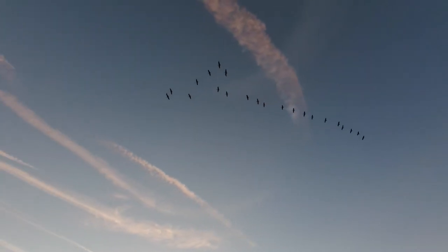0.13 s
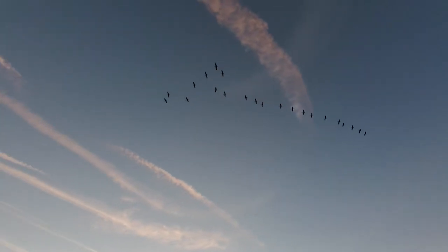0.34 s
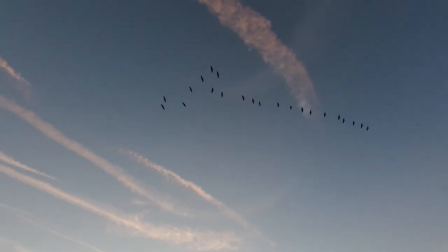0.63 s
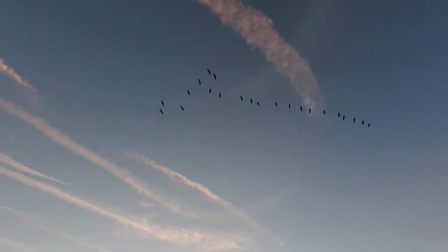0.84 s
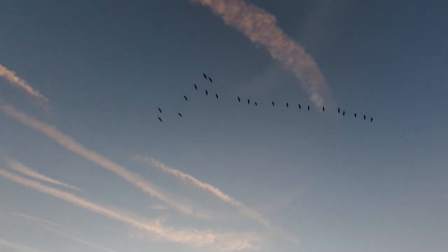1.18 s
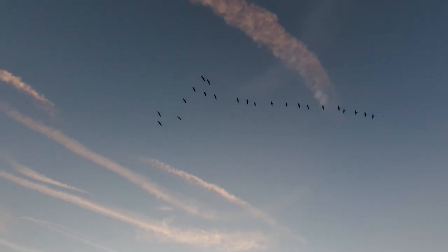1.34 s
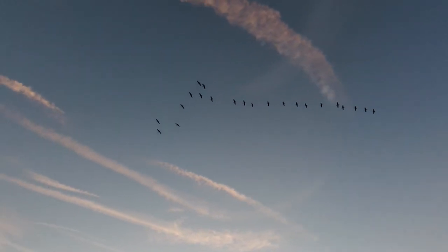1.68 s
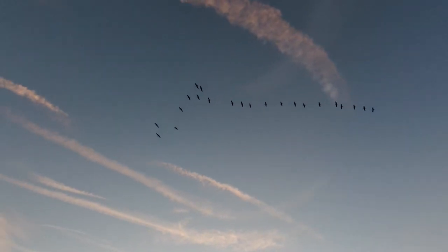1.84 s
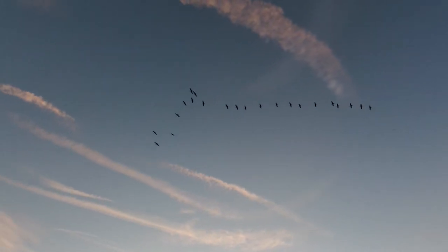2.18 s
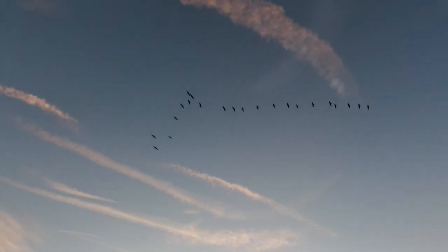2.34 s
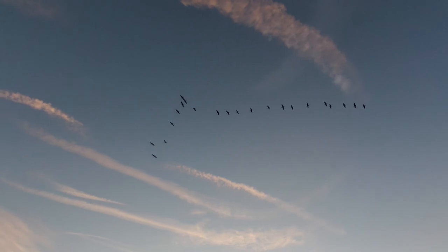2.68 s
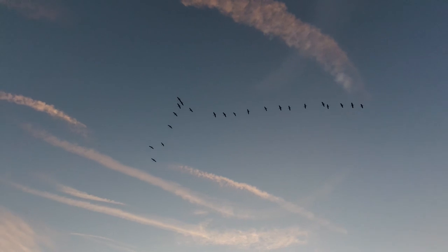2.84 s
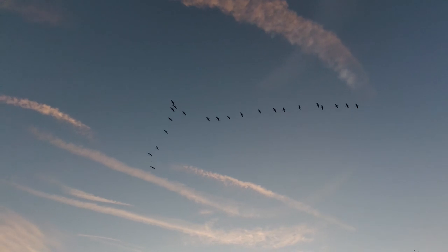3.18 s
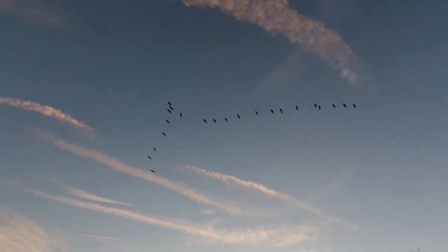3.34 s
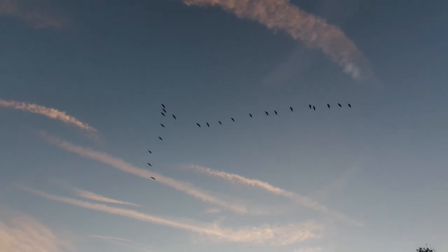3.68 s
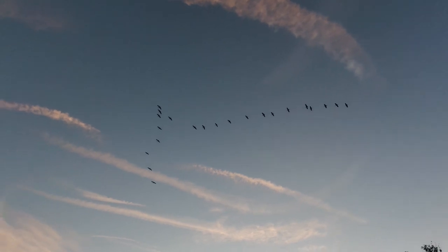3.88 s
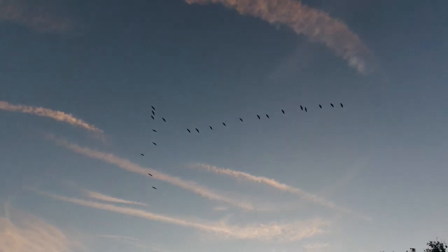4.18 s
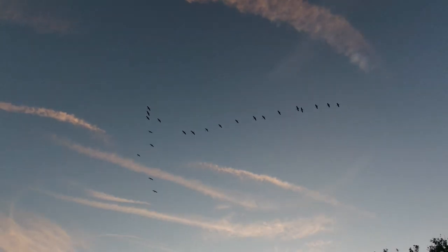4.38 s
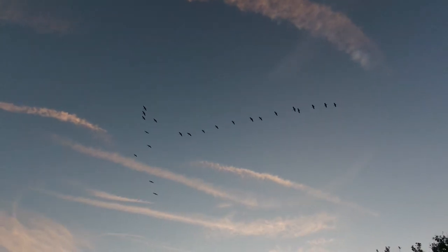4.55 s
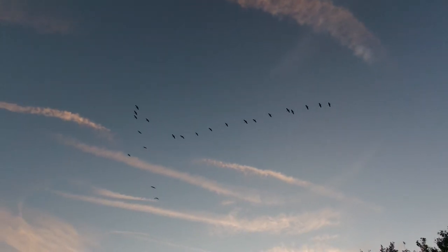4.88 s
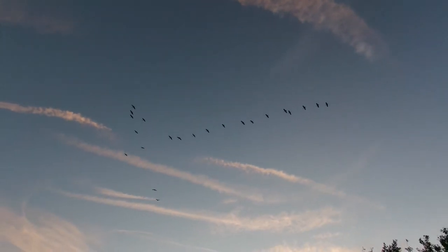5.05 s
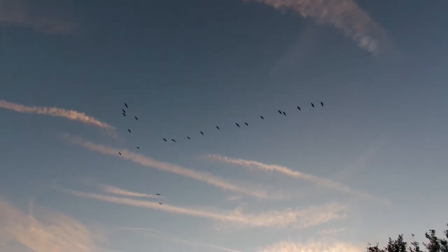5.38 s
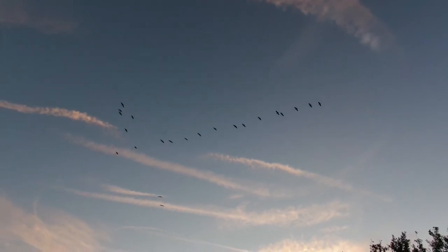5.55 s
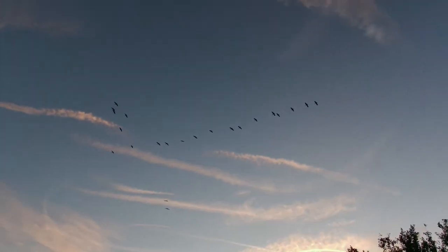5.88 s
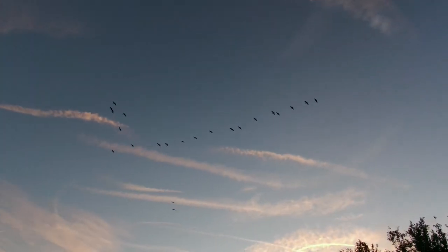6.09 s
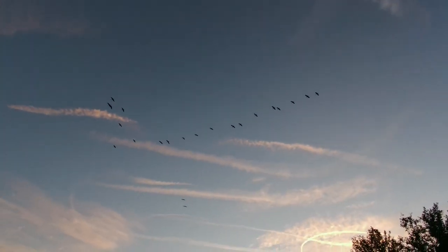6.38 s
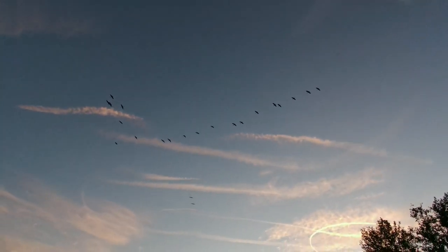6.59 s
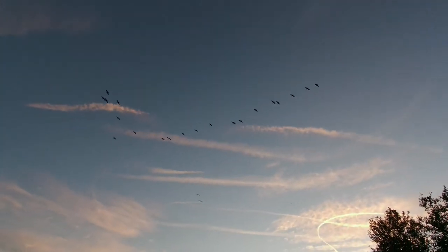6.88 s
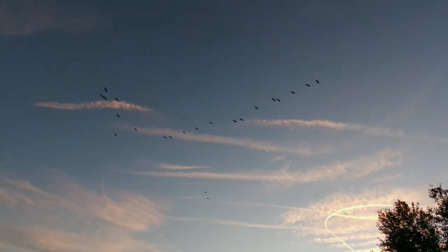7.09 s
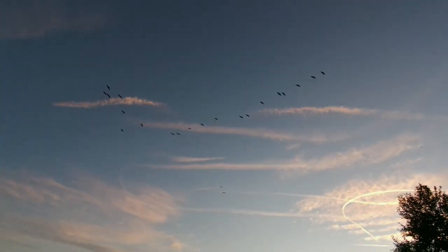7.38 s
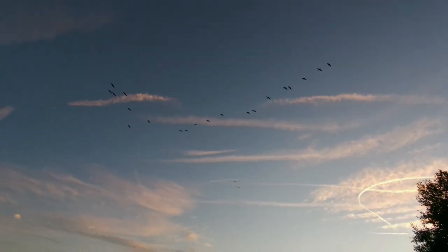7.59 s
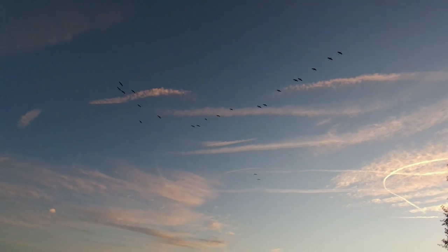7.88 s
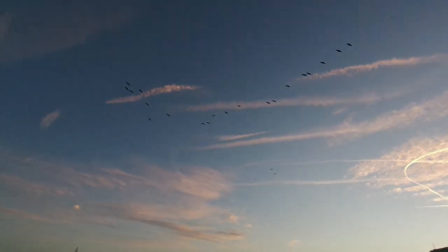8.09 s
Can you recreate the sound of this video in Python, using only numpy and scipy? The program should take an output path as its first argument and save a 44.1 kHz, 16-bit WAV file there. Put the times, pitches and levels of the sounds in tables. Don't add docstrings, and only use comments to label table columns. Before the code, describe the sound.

A wedge of cranes passes overhead in open country, calling without pause. Clear nasal bugle notes and rolled, throaty rattles stand out from a hoarse overlapping chorus that swells in bursts. Young birds occasionally whistle and peep thinly. Trees and fields return a faint dull echo. Beneath lie distant traffic hum and hiss; the hand-held camera adds brief creaks and thin, high motor whines.

```python
import sys
import numpy as np
from scipy import signal
from scipy.fft import rfft, irfft
from scipy.io import wavfile
from scipy.ndimage import uniform_filter1d, map_coordinates

SR = 44100
rng = np.random.default_rng(int(sys.argv[2]) if len(sys.argv) > 2 else 0)


def gain_from_db(level_db):
    decades = np.asarray(level_db, float) / 20
    return 10 ** decades


def put_to_file(sound):
    columns = np.atleast_2d(sound).T
    safe = np.clip(columns, -1, 1)
    whole_steps = np.round(safe * 32767)
    wavfile.write(sys.argv[1], SR, whole_steps.astype(np.int16))


N = 362943
HOARSE_TILT_DB = -0.72


def at_hz(points, hz):
    point_hz, point_db = np.array(points).T
    return np.interp(np.log(hz), np.log(point_hz), point_db)


def drift(n, rate):
    knots = rng.standard_normal(600 if n < SR else int(n * rate / SR) + 6)
    steps = np.arange(0, n + 8, 8)
    curve = map_coordinates(knots, [2 + steps * rate / SR], order=2, mode="mirror")
    return np.interp(np.arange(n), steps, curve)


def add(out, sound, s):
    i = round(s * SR)
    sound, i = sound[..., max(-i, 0):], max(i, 0)
    out[..., i:i + sound.shape[-1]] += sound[..., :N - i]


def fade(n, edge_s):
    to_nearest_end = np.minimum(np.arange(n), np.arange(n)[::-1])
    return np.sin(np.pi / 2 * np.minimum(to_nearest_end / (edge_s * SR), 1)) ** 2


def sine(hz):
    return np.sqrt(2) * np.sin(2 * np.pi * np.cumsum(hz) / SR)


def voice(hz, wobble, tilt_db):
    # (frequency [Hz], level [dB])
    throat_spectrum = [(1250, -1), (1750, 2), (2200, -2.5), (2680, -20.5), (3300, -3.5), (4200, -12),
                       (5100, -14), (6500, -29)]
    flutter_db = 2.5
    jitter = drift(len(hz), 60.0) + 1.6 * drift(len(hz), 350.0)
    phase = 2 * np.pi * np.cumsum(hz * (1 + wobble * jitter)) / SR + rng.uniform(0, 2 * np.pi)
    k = np.arange(2, 8)[:, None]
    throat = gain_from_db(at_hz(throat_spectrum, k * hz[::400]) + tilt_db * k)
    flicker = gain_from_db(flutter_db * rng.standard_normal(size=(6, 64))[:, :throat.shape[1]])
    gains = throat * flicker / np.sqrt(np.sum(throat ** 2, axis=0).mean())
    gains = uniform_filter1d(np.repeat(gains, repeats=400, axis=1), size=400, axis=1)[:, :len(hz)]
    return np.sqrt(2) * np.array([np.sin(phase), np.sum(gains * np.sin(k * phase), axis=0)])


def calls(table, climb_per_s, droop_share, crest, edge, wobble, rasp, uneven_db, tilt_db):
    out = np.zeros(N)
    for s, span, top_hz, low_db, over_db in table:
        t = np.arange(int(span * SR)) / SR
        rise = np.clip(1 - t / (crest * span), 0, 1)
        droop = np.clip(t / span - crest, 0, 1) / (1 - crest)
        hz = top_hz * (1 - climb_per_s * span * rise ** 2 - droop_share * droop ** 2.215)
        low, over = voice(hz, wobble, tilt_db)
        throb_hz = 95 * (1 + 0.268 * drift(len(t), 40.3))
        throb = 1 + rasp * np.sin(2 * np.pi * np.cumsum(throb_hz) / SR)
        effort = fade(len(t), edge * span) * gain_from_db(uneven_db * drift(len(t), 39.0))
        add(out, (low * gain_from_db(low_db) + over * gain_from_db(over_db)) * throb * effort, s)
    return out


def bugles():
    # (start [s], length [s], top pitch [Hz], fundamental [dB], overtones [dB])
    arched = [(.06, 0.26, 838, -58, -69), (.66, 0.3, 831, -52, -74), (.79, 0.07, 661, -55, -61.5),
              (1.86, 0.1, 1095, -82, -59), (2.01, .22, 857, -53, -51.5), (2.68, 0.16, 848, -57.5, -66),
              (3.4, 0.26, 844.7, -41.5, -55.5), (3.43, 0.27, 1026, -48.5, -74),
              (4.14, 0.17, 1194, -63, -60.5), (4.63, 0.25, 845.5, -40.5, -51),
              (6.28, 0.25, 801.6, -47.5, -70.5), (7.39, 0.32, 856.4, -41, -54),
              (7.65, 0.15, 984, -55.5, -67)]
    held = [(-.05, 0.16, 786, -46.5, -59.5), (-.05, 0.16, 1137, -56, -68), (.4, 0.155, 1096, -61, -72.5),
            (8.1, 0.21, 918, -48.5, -59.5), (1.76, 0.14, 1093, -54, -60.5), (1.77, 0.16, 1195, -65, -66.5),
            (3.69, 0.184, 1107, -58, -69.5), (4.84, 0.087, 929, -53, -57.5), (7.02, 0.19, 1100, -53, -56.5),
            (7.26, 0.2, 1255, -64, -73.5), (2.22, 0.14, 827, -51.5, -68.5), (3.62, 0.13, 836, -53, -71),
            (3.63, 0.22, 623, -79, -76), (4.39, 0.29, 833, -49, -65.5), (4.53, 0.162, 800, -46, -56.5),
            (4.83, 0.18, 890, -39, -67), (5.24, 0.12, 805, -45, -56.5), (5.39, 0.24, 813, -50, -70),
            (5.81, 0.2, 1210, -53.5, -72), (6.0, 0.24, 817, -52, -85), (6.56, 0.2, 826, -45.5, -82),
            (8.12, 0.17, 782, -46.5, -56)]
    rising = [
        (4.97, 0.2, 1087, -41.5, -56),
    ]
    swept = [
        (6.99, 0.24, 1165, -42, -55.5),
        (5.65, 0.06, 875, -50, -55.5),
    ]
    falling = [
        (1.53, 0.119, 828, -58, -67),
        (2.17, 0.067, 1215, -53, -68),
        (2.95, 0.078, 952, -53, -56),
        (5.32, 0.116, 962, -44.5, -56.5),
        (7.62, .1, 810, -49, -64),
        (6.82, .095, 940, -51, -62),
    ]
    long_notes = [
        (6.03, .275, 1095, -51, -52),
        (5.18, 0.141, 1105, -55, -58),
        (4.16, .18, 1105, -54, -61.5),
    ]
    veiled = [(.79, 0.21, 1252, -55.5, -69), (1.175, .085, 938, -43.5, -49.5), (2.79, .16, 826, -56, -59.5),
              (2.94, 0.13, 829, -57, -55.5), (2.965, 0.098, 1010, -59, -61), (3.62, .17, 1237, -52.5, -63),
              (4.1, .11, 932, -48, -53), (4.7, .27, 1258, -59, -64), (5.97, .2, 1260, -63, -69),
              (5.905, .07, 925, -52, -59.5), (5.27, 0.091, 1080, -54, -56)]
    rasps = [(.3, 0.32, 1075, -64, -78), (1.02, 0.26, 1112, -41.5, -56), (1.07, .15, 866, -40.5, -61.5),
             (2.15, 0.19, 744, -52.5, -70), (2.2, 0.35, 1098, -67, -69.5), (2.35, 0.31, 1133, -54.5, -81),
             (2.78, 0.3, 990, -52.5, -59.5), (3.6, 0.16, 704, -56, -72), (4.1, 0.3, 1117, -47.5, -61),
             (4.33, 0.23, 757, -48.5, -71), (4.78, 0.19, 977, -45, -60), (5.12, 0.32, 1067, -52, -68),
             (5.2, 0.27, 794.4, -45, -59.5), (5.75, .32, 1143, -50.5, -70.5), (6.5, 0.41, 1155, -56, -70.5),
             (4.5, .22, 1057, -63, -62.5), (7.08, 0.22, 1060, -45, -62), (7.12, 0.23, 805, -44.5, -61.5),
             (7.14, 0.17, 690, -70, -54), (7.2, 0.16, 1253, -62, -73), (7.92, 0.31, 1040, -48.5, -65.5),
             (6.1, .14, 940, -52, -59), (5.1, .2, 925, -52, -58)]

    held_climb = 0.1202
    arched_droop = 0.0943
    clear = dict(wobble=.003, rasp=.15, uneven_db=1.2, tilt_db=-1.3)
    out = calls(arched, 0.2406, arched_droop, crest=.45, edge=.25, **clear)
    out += calls(held, held_climb, 0.0082, crest=.42, edge=.27, **clear)
    out += calls(rising, held_climb, -0.044, crest=.42, edge=.27, **clear)
    out += calls(swept, .42, arched_droop, crest=.6, edge=.15, **clear)
    out += calls(falling, held_climb, 0.0883, crest=.1, edge=.18, **clear)
    out += calls(long_notes, 0.05, 0.072, crest=.72, edge=.1,
                 wobble=.002, rasp=.1, uneven_db=1.0, tilt_db=-3.0)
    out += calls(veiled, held_climb, 0.0604, crest=.35, edge=.18,
                 wobble=.005, rasp=.25, uneven_db=1.5, tilt_db=-5.5)
    out += calls(rasps, held_climb, 0.097, crest=.42, edge=.27,
                 wobble=.02, rasp=.7, uneven_db=2.2, tilt_db=HOARSE_TILT_DB)
    return out


def chorus(count=112):
    # (time [s], hold [s], fundamentals [dB], overtones [dB])
    surges = [(0.0, 0.037, -42.5, -51), (0.434, 0.14, -49.5, -73), (0.773, 0.082, -42.5, -52.5),
              (1.12, 0.25, -45, -48.5), (1.548, 0.12, -46, -55), (1.903, 0.23, -46.5, -51.5),
              (2.173, 0.11, -41.5, -56), (2.906, 0.083, -40.5, -49), (3.655, 0.056, -39, -54),
              (4.07, 0.068, -43, -46), (4.347, .05, -44.5, -56), (4.864, 0.17, -36, -49.5),
              (5.226, 0.19, -36.5, -42.5), (5.647, 0.19, -42, -56.5), (6.176, 0.15, -38.5, -49.5),
              (6.547, 0.18, -40.5, -59), (6.863, 0.092, -43.5, -59), (7.186, 0.12, -37.5, -47),
              (7.542, 0.18, -41, -51), (8.22, 0.039, -43.5, -47)]
    low_slope, over_slope = 61, 116
    murmur_db, murmur_over_db = -51, -67
    both = np.full((2, N), 1e-9)
    for k, s in enumerate(np.linspace(-.2, N / SR, count)):
        span, spread, roll_hz, rasp_hz, rolled = rng.uniform([.18, .93, 20.0, 75, 0], [.36, 1.07, 25.73, 125, 1.28])
        top_hz, bird_db = [(830, 0.36), (1090, -0.26)][k % 2]
        t = np.arange(int(span * SR)) / SR
        arch = top_hz * spread * (1 - .1 * (2 * t / span - .85) ** 2)
        roll = 1 - rolled * np.cos(np.pi * roll_hz * t) ** 2
        throb_hz = rasp_hz * (1 + 0.2617 * drift(len(t), 39.9))
        rasp = 1 + 0.48 * np.sin(2 * np.pi * np.cumsum(throb_hz) / SR)
        call = voice(arch, wobble=0.01542, tilt_db=HOARSE_TILT_DB)
        add(both, gain_from_db(bird_db) * call * roll * rasp * fade(len(t), 0.029), s)
    both = signal.sosfilt(signal.butter(4, 640, "high", fs=SR, output="sos"), both)
    both /= 1e-6 + np.sqrt(uniform_filter1d(both ** 2, size=6000, axis=1))

    s, hold, low_db, over_db = np.transpose(surges)[..., None]
    t = np.linspace(0, N / SR, num=N // 64)
    away = np.maximum(np.abs(t - s) - hold / 2, 0)
    low = np.maximum(np.max(low_db - low_slope * away, axis=0), murmur_db)
    over = np.maximum(np.max(over_db - over_slope * away, axis=0), murmur_over_db)
    now = np.arange(N) / SR
    return both[0] * gain_from_db(np.interp(now, t, low) - 4.0) + both[1] * gain_from_db(np.interp(now, t, over) - 9.5)


def air():
    # (frequency [Hz], level [dB per Hz])
    air_spectrum = [(20, -49), (32, -15.5), (55, -11), (105, -5.5), (250, -13.5), (560, -17.5),
                    (1000, -12.5), (2000, -25.5), (3000, -31), (5000, -35), (6600, -35), (7700, -33),
                    (9500, -38), (15600, -40)]
    hz = np.fft.rfftfreq(N, 1 / SR) + 1
    shape = gain_from_db(at_hz(air_spectrum, hz))
    noise = irfft(rfft(rng.standard_normal(N)) * shape, N)
    low_band = np.sqrt(np.sum(shape[hz < 550] ** 2) / len(hz))
    return gain_from_db(-62.5) * noise / low_band


def steady_tones():
    # (frequency [Hz], level [dB])
    tones = [
        (103, -73),
        (6000, -82),
        (9000, -93),
        (12000, -97),
    ]
    t = np.arange(N) / SR
    out = np.zeros(N)
    for hz, db in tones:
        out += gain_from_db(db + 0.63 * drift(N, 11.0)) * np.sqrt(2) * np.sin(2 * np.pi * hz * t)
    return out


def landscape(x):
    # (delay [s], level [dB])
    echoes = [
        (.013, -21),
        (.031, -21),
        (.068, -23),
        (.12, -17.5),
    ]
    haze_db, haze_t60_s = -13, 0.23
    dull = signal.lfilter([.3], [1, -.7], x)
    out = x.copy()
    for s, db in echoes:
        add(out, gain_from_db(db) * dull, s)
    t = np.arange(SR // 2) / SR
    scatter = rng.standard_normal(len(t)) * gain_from_db(-60 * t / haze_t60_s) * (t > .01)
    scatter /= np.sqrt(np.sum(scatter ** 2))
    return out + gain_from_db(haze_db) * signal.fftconvolve(dull, scatter)[:N]


def glides(table, waver, trill_db):
    out = np.zeros(N)
    for s, span, from_hz, to_hz, db in table:
        n = int(span * SR)
        hz = np.linspace(from_hz, to_hz, n) * (1 + waver * drift(n, 224.0))
        level = gain_from_db(db + trill_db * drift(n, 94.7)) * fade(n, 0.0024)
        add(out, level * sine(hz), s)
    return out


def turned_birds():
    # (start [s], length [s], from [Hz], to [Hz], level [dB])
    turned = [(.07, 0.14, 1653, 1700, -58), (.185, 0.13, 1704, 1590, -57.5),
              (1.89, 0.12, 1380, 1316, -68.5), (3.14, 0.11, 1627, 1640, -66),
              (4.13, 0.19, 1424, 1363, -58.5), (5.59, .05, 1464, 1460, -58), (5.13, 0.08, 1400, 1370, -61),
              (5.195, 0.12, 4440, 4390, -65), (5.66, 0.046, 3500, 3480, -61),
              (6.53, 0.037, 3220, 3150, -69), (6.14, .09, 4400, 4370, -70), (6.84, .055, 3720, 3660, -68)]
    return glides(turned, waver=.003, trill_db=1.5)


def rolls():
    # (time [s], overtones peak [dB], second partial [Hz], fundamental [dB])
    beats = [(.083, -47, 1658, -41), (.133, -52, 1674, -44), (.171, -51, 1780, -44),
             (.209, -49, 1780, -39.5), (.255, -51, 1743, -46), (.699, -52, 1560, -45),
             (.728, -48, 1576, -40), (.776, -45, 1670, -36.5), (.799, -51, 1557, -43),
             (.846, -48.5, 1603, -46), (.990, -41, 1894, -45), (1.031, -43.5, 1990, -40),
             (1.073, -44, 2103, -40), (1.116, -41, 2146, -40), (1.162, -42, 2150, -37),
             (1.229, -45, 2104, -41), (1.274, -44, 2064, -40.5), (1.321, -44, 2060, -40.5),
             (1.372, -45.5, 2005, -46), (1.405, -46.5, 1803, -46), (1.441, -48, 1800, -44),
             (1.485, -46.5, 1803, -39), (1.527, -47, 1760, -42.5), (1.564, -50, 1703, -47),
             (1.615, -54, 1620, -50), (2.763, -49, 1890, -42.5), (2.806, -44.5, 1950, -39.5),
             (2.844, -46, 2004, -39), (2.895, -42, 1947, -36), (2.936, -44, 2000, -37.5),
             (3.154, -59, 1640, -54), (3.183, -57, 1660, -52), (3.219, -56, 1720, -50),
             (3.262, -54.5, 1695, -52), (3.304, -54, 1690, -51), (3.346, -56, 1653, -55),
             (3.843, -52, 1960, -44), (3.888, -48, 1880, -42), (3.933, -44, 1984, -33),
             (3.975, -42, 2020, -32), (4.021, -44, 2036, -37.5), (4.066, -45.5, 2040, -40),
             (4.087, -49, 1896, -37), (4.119, -44, 1906, -42),
             (4.459, -52, 1643, -38.5), (4.499, -56, 1640, -43), (4.531, -51, 1628, -40),
                  (4.648, -49.5, 1676, -36), (4.689, -49, 1696, -33.5), (4.975, -49, 1950, -39),
                  (5.59, -50, 1680, -42), (5.63, -49, 1702, -38), (5.675, -52, 1833, -36),
                  (5.719, -54, 1730, -41.5), (5.789, -49, 1880, -43), (5.833, -50, 1950, -38.5),
                  (5.867, -52, 1927, -40), (5.906, -50, 1898, -38.5), (6.309, -52, 1773, -39.5),
                  (6.36, -52, 1777, -40.5), (6.399, -53, 1784, -39), (6.435, -52.5, 1790, -35.5),
                  (6.482, -53, 1790, -38), (6.519, -56, 1810, -40.5), (6.549, -57, 1700, -39),
                  (6.647, -56, 1698, -41), (6.67, -53, 1804, -40), (6.718, -50.5, 1760, -39),
                  (6.757, -52, 1740, -45), (6.792, -53, 1770, -45), (7.001, -48.5, 2148, -40),
                  (7.331, -55, 1800, -37), (7.375, -53, 1800, -39.5), (7.401, -51.5, 1950, -38),
                  (7.455, -52, 2005, -40), (7.499, -44.5, 2043, -37.5), (7.549, -43.5, 2060, -37),
                  (7.599, -47, 2010, -41), (7.639, -52, 1980, -44), (7.859, -59, 2194, -48.5),
                  (7.916, -55.5, 2205, -47), (7.944, -48.5, 1848, -46.5), (7.995, -48, 1897, -48),
                  (8.028, -49, 2150, -44), (8.073, -45.5, 2020, -39), (8.117, -47, 2005, -43)]
    rise_s, dies_s, sag_per_s = 0.0064, 0.023, 2.6
    lead_s = .006
    breath_db = -14.5
    out, t = np.zeros(N), np.arange(1900) / SR
    beak = signal.butter(3, [1500, 4800], "band", fs=SR, output="sos")
    muffle = signal.butter(3, 3500, fs=SR, output="sos")
    for s, over_db, second_hz, low_db in beats:
        hz = second_hz / 2 * (1.045 - sag_per_s * t)
        low, over = voice(hz, wobble=.022, tilt_db=-1.4)
        puff = signal.sosfilt(beak, 2 * rng.standard_normal(len(t)))
        over = signal.sosfilt(muffle, over) + gain_from_db(breath_db) * puff
        lobe_hz = rng.uniform(60, 85)
        lobes = 1 + 0.43 * np.cos(2 * np.pi * lobe_hz * (t - .009))
        beat = (1 - np.exp(-(t / rise_s) ** 2)) * np.exp(-(t / dies_s) ** 2) * lobes
        add(out, (low * gain_from_db(low_db - 1.5) + over * gain_from_db(over_db - 6.0)) * beat, s - lead_s)
    return out


def motor_chatter():
    # (start [s], length [s], level [dB])
    chatter = [(0.25, .45, -70.5), (1.583, 0.053, -69), (1.688, 0.0156, -64), (1.89, 0.11, -70),
               (2.115, 0.2, -69.5), (2.702, 0.15, -68), (3.225, 0.14, -76.5), (3.39, .04, -77),
               (3.472, 0.084, -68), (4.42, 0.054, -68), (4.702, 0.14, -71), (5.25, .08, -73),
               (6.315, 0.2, -68)]
    out = np.zeros(N)
    for s, span, db in chatter:
        n = int(span * SR)
        hz = 14300 + 750 * np.clip(drift(n, 49.0), -2, 2) + 800 * drift(n, 1100.0)
        level = gain_from_db(db + 2.0 * drift(n, 30.0)) * fade(n, .006)
        add(out, level * np.sin(2 * np.pi * np.cumsum(hz) / SR), s)
    return out


def squeals():
    # (time [s], pitch [Hz], level [dB])
    paths = [
        [(.61, 3700, -78), (.645, 3930, -66), (.70, 3920, -65.5), (.735, 3900, -64), (.776, 3350, -65),
         (.81, 3500, -70), (.85, 3750, -56), (.885, 3750, -67), (.93, 3650, -76)],
        [(7.94, 3600, -66), (7.99, 3870, -68), (8.03, 4250, -67), (8.075, 4400, -64), (8.125, 4250, -67),
         (8.165, 3900, -72), (8.2, 3550, -76)],
    ]
    out = np.zeros(N)
    for path in paths:
        s, hz, db = np.transpose(path)
        t = np.arange(s[0], s[-1], 1 / SR)
        pitch = uniform_filter1d(np.interp(t, s, hz), size=600) * (1 + .016 * drift(len(t), 250.0))
        level = gain_from_db(np.interp(t, s, db) + 3.0 * drift(len(t), 80.5)) * fade(len(t), .006)
        add(out, level * sine(pitch), s[0])
    return out


def grip_creaks():
    # (start [s], length [s], from [Hz], to [Hz], level [dB])
    creaks = [
        (.81, 0.068, 439, 262, -58),
        (1.11, 0.048, 294, 287, -55.5),
        (1.18, 0.071, 254, 182, -57),
    ]
    return glides(creaks, waver=0.1, trill_db=0.5)


def motor_whine():
    # (lowest point [s], half length [s], lowest pitch [Hz], level [dB])
    shakes = [(.83, 0.017, 15050, -66), (0.918, 0.091, 6980, -61), (.99, 0.054, 12900, -63.5),
              (1.057, 0.042, 8200, -61.5), (1.131, 0.076, 8700, -62), (1.216, 0.03, 11300, -72),
              (1.247, .02, 13100, -63), (1.433, 0.035, 15100, -69), (1.475, .035, 13900, -64),
              (3.918, 0.052, 12400, -72), (4.33, 0.069, 12550, -73), (4.978, 0.049, 12600, -73),
              (5.16, 0.031, 14000, -68), (5.632, .055, 12300, -64), (6.75, 0.054, 12800, -62),
              (6.83, 0.044, 13900, -64), (7.175, .035, 11500, -71), (7.243, .075, 10260, -65),
              (7.808, 0.042, 11500, -70), (7.914, 0.082, 10350, -65), (8.0, 0.044, 15000, -64),
              (8.182, 0.071, 12700, -62), (8.24, 0.055, 8050, -61)]
    # (frequency [Hz], level [dB])
    colour = [(7000, 3.5), (10000, -4), (14000, -1)]
    rest_hz, roundness = 15200, 1.92
    s, half, low_hz, db = np.transpose(shakes)[..., None]
    t = np.arange(0, N, step=16) / SR
    dives = low_hz + (rest_hz - low_hz) * np.abs((t - s) / half) ** roundness
    path_hz = np.repeat(np.minimum(dives.min(axis=0), rest_hz), repeats=16)[:N]
    level = np.repeat(gain_from_db(db[dives.argmin(axis=0), 0]), repeats=16)[:N]
    heard = uniform_filter1d(level * (path_hz < rest_hz), size=200)
    hz = uniform_filter1d(path_hz, size=800) * (1 + .012 * drift(N, 60.0) + .018 * drift(N, 400.0))
    speed = np.abs(np.gradient(uniform_filter1d(hz, size=600)))
    sputter = gain_from_db(5.0 * drift(N, 70.0) - speed * 3.2)
    phase = 2 * np.pi * np.cumsum(hz) / SR
    octave = gain_from_db(-11) * (2 * hz < rest_hz) * np.sin(2 * phase)
    return heard * sputter * (gain_from_db(at_hz(colour, hz)) * np.sin(phase) + octave)


def peeps():
    # (start [s], length [s], from [Hz], to [Hz], level [dB])
    trills = [
        (4.97, 0.08, 5000, 4500, -69),
        (5.32, 0.13, 4400, 3900, -70),
        (.84, .02, 4500, 4100, -72),
    ]
    return glides(trills, waver=.018, trill_db=3.5)


def croaks():
    # (start [s], length [s], from [Hz], to [Hz], level [dB])
    low_slips = [
        (1.15, .14, 569, 542, -66),
        (5.16, .18, 530, 502, -68),
        (7.24, .1, 519, 479, -65),
    ]
    return glides(low_slips, waver=.05, trill_db=3.5)


def scene():
    birds = bugles() + chorus() + turned_birds() + rolls() + squeals() + peeps() + croaks()
    camera = steady_tones() + motor_chatter() + grip_creaks() + motor_whine()
    return (landscape(birds) + air() + camera)[None]


def low_pass(x):
    return signal.sosfilt(signal.butter(12, 15710, fs=SR, output="sos"), x)


def record(dry):
    return low_pass(dry)


dry = scene()
out = record(dry)
put_to_file(out)
```